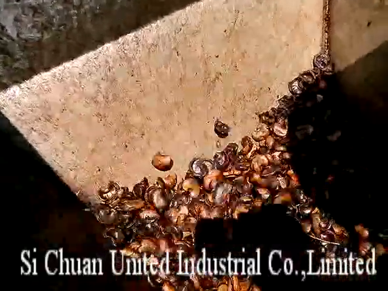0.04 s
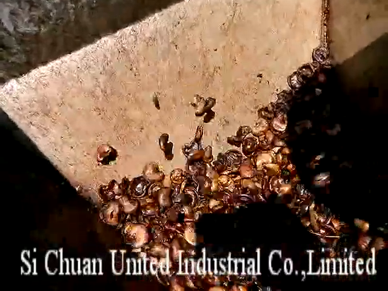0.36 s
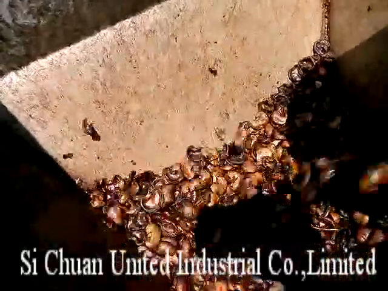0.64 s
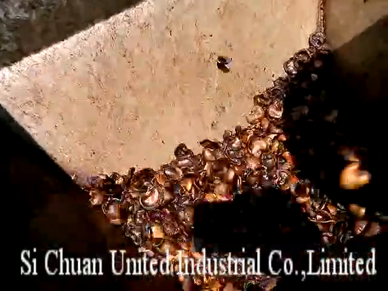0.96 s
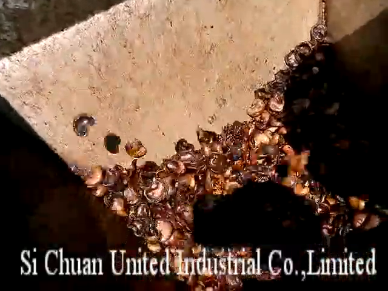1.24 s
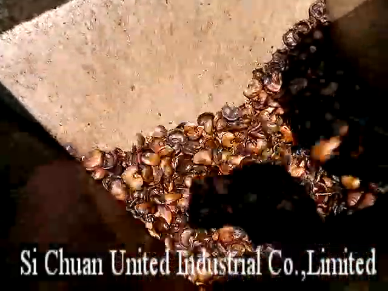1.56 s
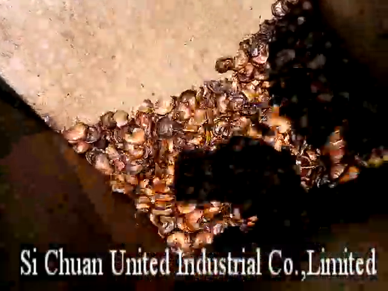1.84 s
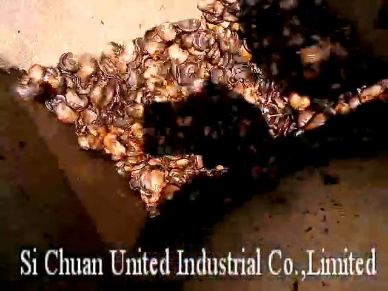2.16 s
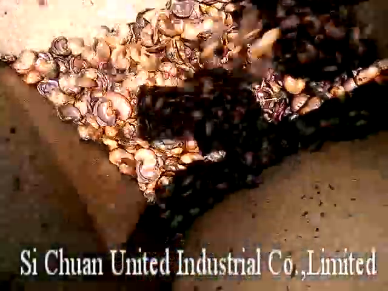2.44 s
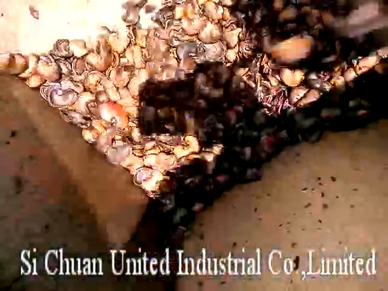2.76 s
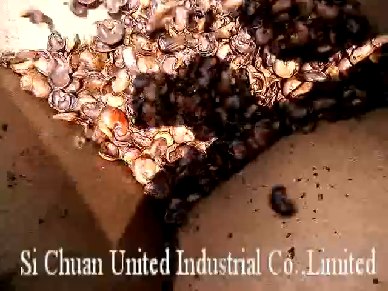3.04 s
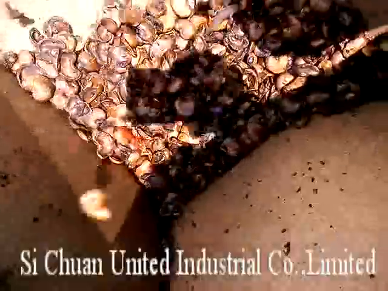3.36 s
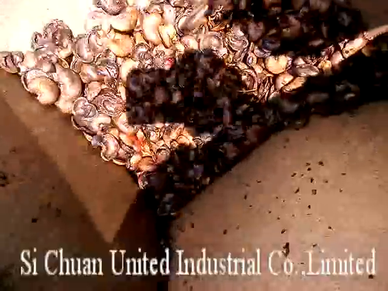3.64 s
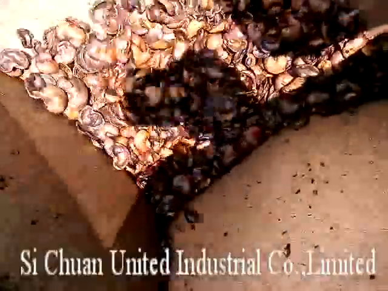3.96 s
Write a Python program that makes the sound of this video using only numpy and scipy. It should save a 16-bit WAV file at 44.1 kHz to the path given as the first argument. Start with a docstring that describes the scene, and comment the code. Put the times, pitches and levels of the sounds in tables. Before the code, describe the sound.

A screw press crushes nut shells, heard close to its hopper. From the start, dense crackling runs over a rumbling, humming drive and a screw grinding and briefly groaning against ringing steel. Hard shells split and clatter on metal at irregular moments, hitting harder from about 2 to 3 seconds, with a last few just before the end at 4 seconds. The sound is dull and distorts on peaks.

```python
"""A screw press crushes nut shells in a factory, heard close to the hopper that feeds it.
From the start the drive rumbles and hums, the screw grinds and groans against its ringing steel barrel,
and shells crackle without pause. Now and then a hard shell splits, or a batch bursts and clatters on
the metal. The bursts hit harder from about 2 s to 3 s, and a last few come just before the end at 4 s.
All along, the sound is dull, with little above 4.6 kHz, and distorts on the peaks."""
import sys
import numpy as np
from scipy import signal
from scipy.fft import rfft, irfft
from scipy.io import wavfile

SR = 44100
rng = np.random.default_rng(int(sys.argv[2]) if len(sys.argv) > 2 else 0)


def store_pcm(level_fs):
    """Save levels as 16-bit WAV."""
    pcm = np.round(np.clip(level_fs, -1, 1) * 32767).astype(np.int16)
    wavfile.write(sys.argv[1], SR, np.atleast_2d(pcm).T)


N = 176400
TIME = np.arange(N) / SR
SURGE_HZ = 23  # how fast the loudness flutters
FRAGMENTS_PER_S, FRAGMENT_SPREAD_DB = 2600, 2.9


def shells(clatter, snap):
    """Crushed shells crackle and knock; at each burst they snap and shower the steel with bits."""
    # how strongly shells are being crushed: (time [s], relative level [dB])
    feed = [(0, -13), (1.98, -13), (2.05, -15), (2.1, -9), (2.6, -13), (2.82, -11.5), (3.84, -10.5),
            (4, -11)]
    # strength of the bright part of the crackle: (time [s], relative level [dB])
    treble = [(0, -19), (1.26, -18.5), (1.4, -20), (2.7, -21), (3.16, -14.5), (3.46, -25.5), (3.48, -22),
              (4, -17)]
    # tone colour of the crackle: (frequency [Hz], relative level [dB])
    crackle_colour = [(300, -12.5), (600, -9.5), (950, 0.5), (1400, 4), (1750, 0), (2370, -2), (3300, 0),
                      (3750, -5.5), (4300, -17.5), (5000, -33.5)]
    # tone colour of bits hitting steel: (frequency [Hz], relative level [dB])
    clatter_colour = [(400, -11), (750, -16), (1100, 0), (1500, 4), (1900, -6), (2600, -11), (4500, -39.5)]
    # tone colour of the shells' own snap: (frequency [Hz], relative level [dB])
    snap_colour = [(900, -43), (1700, -3.5), (2200, 1.5), (2800, 3), (3350, 2), (3800, -14), (4800, -19)]
    split_hz, top_hz = 2436, 3270  # borders between dull, bright and top
    dull, bright, top = (colour(clicks(per_s=2200, spread_db=1), crackle_colour) for _ in range(3))
    dull = keep_side(dull, split_hz, "low")
    bright = keep_side(keep_side(bright, split_hz, "high"), top_hz, "low")
    bright += from_db(3.5 * drift(SURGE_HZ)) * keep_side(top, top_hz, "high")  # the top flickers
    feed_db = in_time(feed)
    out = np.hypot(from_db(feed_db - 7.5), 0.24 * clatter) * knocks()  # louder during bursts
    for crackle, level_db in ((dull, feed_db - 6), (bright, in_time(treble) - 1.5)):
        out += from_db(level_db + 1.86 * drift(SURGE_HZ)) * rms_one(crackle)
    on_steel = from_db(-6) * clatter * colour(fragments(), clatter_colour)
    breaking = from_db(-5) * snap * colour(fragments(), snap_colour)
    return out + on_steel + breaking


def bursts():
    """Batches of shells give way: three loudness curves that jump up, hold and die away."""
    # bursting batches, with relative levels:
    # (time [s], length [s], barrel ring [dB], clatter [dB], snap [dB])
    batches = [(0.021, 0.046, -14, -9, -10.5), (0.164, 0.011, -29.5, -10, -6.5),
               (0.391, 0.038, -13, -12.5, -17.5), (0.539, 0.023, -17, -7, -21),
               (1.046, 0.04, -11.5, -13, -9.5), (1.227, 0.062, -14, -10, -8.5),
               (1.314, 0.024, -15.5, -9, -14.5), (1.42, 0.027, -16.5, -25, -20),
               (1.538, 0.008, -30.5, -5.5, -13.5), (1.829, .012, -17.5, -6.5, -5.5),
               (2.060, 0.035, -12, -3.5, -10), (2.211, 0.0067, -5, -6, -20.5),
               (2.245, 0.016, -7.5, -15, -34), (2.669, 0.042, -13, -14, -16.5),
               (2.755, 0.0094, -5, -6.5, -11.5), (2.831, 0.047, -7, -5, -11.5),
               (2.89, 0.15, -23.5, -9, -27), (3.002, 0.034, -12.5, -5, -18), (3.155, 0.09, -13, -18, -16),
               (3.539, 0.042, -35.5, -7, -16), (3.74, 0.0079, -7.5, -7, -25), (3.9, 0.033, -18, -4, -10),
               (3.948, 0.012, -17, -2, -27)]
    rise_s, decay_s = 0.0015, 0.014
    power = np.zeros((3, N))
    for start_s, length_s, *levels_db in batches:
        start = int(start_s * SR)
        age = TIME[start:][:SR // 2] - start_s
        shape = np.clip(age / rise_s, 0, 1) * np.exp(-np.maximum(age - length_s, 0) / decay_s)
        power[:, start:start + len(age)] += np.outer(from_db(levels_db), shape) ** 2
    return np.sqrt(power)


def fragments():
    """Breaking shell makes a dense run of clicks, many small and a few large."""
    return clicks(FRAGMENTS_PER_S, FRAGMENT_SPREAD_DB)


def knocks():
    """Single shells hit the hopper and ring at random pitches; high ones die sooner."""
    per_s, low_hz, high_hz = 170, 798.4, 3290
    ring_cycles = 147  # vibrations it takes to fade by 60 dB
    out, age = np.zeros(N + SR), TIME[:SR // 10]
    for when, pitch, size, flip in rng.random((2000, 4))[:int(per_s * N / SR)]:
        hz = low_hz * (high_hz / low_hz) ** pitch
        db = 2.5 * min(-np.log(size), 3) - 60 * age * hz / ring_cycles
        ring = from_db(db) * np.sin(2 * np.pi * hz * age)
        out[int(when * N):][:len(age)] += ring * np.sign(flip - .5)
    return rms_one(out[:N])


def cracks():
    """A hard shell splits: a quick, fading run of tiny breaks rings around one pitch."""
    # hard shells splitting: (time [s], pitch [Hz], level [dB])
    splits = [(0.036, 1964, -12), (0.343, 2500, -26), (1.051, 2330, -11.5), (1.862, 2760, -20),
              (2.062, 1600, -12), (2.668, 2020, -13), (2.77, 1750, -9), (2.865, 1534, -17),
              (3.191, 2000, -10.5), (3.264, 2680, -17), (3.479, 2080, -11.5), (3.568, 3050, -12.5),
              (3.918, 3150, -13)]
    peak_s = 0.0053
    out, age = np.zeros(N + SR), TIME[:SR // 10]
    shape = age / peak_s * np.exp(1 - age / peak_s)
    shape_rms = np.sqrt(np.mean(shape ** 2))
    for start_s, hz, db in splits:
        ring = resonate(fragments()[:len(age)] * shape, hz, width_hz=220)
        out[int(start_s * SR):][:len(age)] += from_db(db) * rms_one(ring) * shape_rms
    return out[:N]


def screw(jolts):
    """The drive shakes the barrel's low notes; the rubbing screw and bursts ring the higher ones."""
    # grinding load on the screw: (time [s], relative level [dB])
    load = [(0, -13.5), (.3, -18), (.41, -9.5), (.52, -18), (1.3, -17.5), (1.75, -17.5), (2.05, -14.5),
            (2.26, -14.5), (2.42, -16.5), (2.68, -13), (2.74, -22), (2.82, -12.5), (3.5, -18),
            (3.77, -16.5), (4, -14)]
    split_hz = 472
    shaking = from_db(-18.5) * rms_one(keep_side(rng.standard_normal(N), split_hz, "low"))
    rubbing_db = in_time(load) - 1.5 + 4.2 * drift(SURGE_HZ)
    rubbing = from_db(rubbing_db) * clicks(per_s=1800, spread_db=-0.5)
    knocking = jolts * fragments()
    return barrel(shaking) + barrel(keep_side(rubbing + knocking, split_hz, "high"))


def barrel(force):
    """The steel rings at its own notes, as strongly as the force that pushes it."""
    # notes of the barrel and hopper: (pitch [Hz], width [Hz], relative level [dB])
    notes = [(375.3, 36, -2), (419.2, 19.5, 4.5), (445.7, 19.7, 1.5), (497, 21, 1.5), (551.4, 16.4, 4),
             (608, 70, -1), (660, 35.6, 0), (753.4, 21, 5), (810, 45, 1.5), (1092, 92, -5), (1306, 13, -9),
             (1419, 37, -10)]
    out = 0
    for k, (hz, width_hz, db) in enumerate(notes):
        delayed = np.roll(force, k * SR // 1000)  # each note is pushed 1 ms after the last
        out = out + from_db(db) * resonate(delayed, hz, width_hz)
    return rms_one(out) * force.std()


def groans():
    """The screw sticks for a moment, and one note of the press swells and fades."""
    # groans of the press: (time [s], pitch [Hz], level [dB])
    swells = [(0.05, 756, -16.5), (0.085, 554, -18), (0.146, 554, -16), (0.152, 189.5, -13),
              (0.208, 553, -19), (1.101, 177, -19), (1.612, 176.5, -15), (1.664, 199, -17),
              (2.243, 408, -15), (2.518, 412, -13.5), (2.897, 440, -13), (2.991, 557, -14),
              (3.169, 763, -17), (3.247, 201.3, -19.5), (3.39, 180.5, -17), (3.773, 748, -16.5)]
    width_s = 0.023
    out = np.zeros(N)
    for peak_s, hz, db in swells:
        swell = np.exp(-((TIME - peak_s) / width_s) ** 2 / 2)
        out += from_db(db) * swell * tone(hz)
    return out


def drive():
    """The motor and gearbox make a fluttering rumble and a few wavering tones."""
    # tone colour of the rumble: (frequency [Hz], relative level [dB])
    rumble_colour = [(25, -45), (62, -16), (85, -18), (105, -7.5), (155, -3), (210, 0.5), (250, -4),
                     (280, -8.5), (400, -17), (800, -54.5)]
    # motor and gear tones: (pitch [Hz], average level [dB])
    hum = [(177.6, -34.5), (299.5, -33.5), (552, -30.5)]
    out = from_db(-19.5 + 2.5 * drift(SURGE_HZ)) * colour(rng.standard_normal(N), rumble_colour)
    for hz, db in hum:
        out += from_db(db + 3.5 * drift(3.3)) * tone(hz)
    return out


def clicks(per_s, spread_db):
    """Clicks at random moments; a spread further from 0 makes their sizes more uneven."""
    sizes = from_db(spread_db * np.minimum(rng.exponential(1, N), 4))
    happens = rng.random(N) < per_s / SR
    return rms_one(happens * sizes * rng.choice([-1, 1], N))


def resonate(force, hz, width_hz):
    """Ring at one pitch; the smaller the width, the longer the ring."""
    r = np.exp(-np.pi * width_hz / SR)
    feedback = [1, -2 * r * np.cos(2 * np.pi * hz / SR), r * r]
    return (1 - r * r) * signal.lfilter([1, 0, -1], feedback, force + 1e-18)


def tone(hz):
    """A pure tone whose pitch wanders slightly."""
    pitch_hz = hz * (1 + 0.0025 * drift(2.76))
    return np.sqrt(2) * np.sin(2 * np.pi * np.cumsum(pitch_hz) / SR)


def colour(x, spectrum):
    """Give a sound the tone colour in a table, at an average power of 1."""
    hz, db = np.transpose(spectrum)
    curve_db = np.interp(np.log(np.fft.rfftfreq(N, 1 / SR) + 1), np.log(hz), db)
    # a minimum-phase filter: it rings after each click, never before
    cepstrum = irfft(np.log(from_db(curve_db)), N)
    cepstrum[1:N // 2] *= 2
    cepstrum[N // 2 + 1:] = 0
    return rms_one(irfft(rfft(x) * np.exp(rfft(cepstrum)), N))


def keep_side(x, hz, side):
    """Keep the "low" or the "high" side of a frequency."""
    return signal.sosfilt(signal.butter(4, hz, side, fs=SR, output="sos"), x)


def drift(hz):
    """A smooth random wobble of typical size 1, mostly slower than hz."""
    smoothing = 1 + (np.fft.rfftfreq(N, 1 / SR) / hz) ** 2
    return rms_one(irfft(rfft(rng.standard_normal(N)) / smoothing, N))


def in_time(rows):
    """Join (time, value) points with straight lines."""
    return np.interp(TIME, *np.transpose(rows))


def rms_one(x):
    """Scale to an average power of 1."""
    return x / np.sqrt(np.mean(x ** 2) + 1e-20)


def from_db(db):
    """Turn decibels into a number to multiply by."""
    return 10 ** (np.asarray(db) / 20)


def scene():
    """The press and its shells together, in one channel."""
    jolts, clatter, snap = bursts()
    return (drive() + screw(jolts) + shells(clatter, snap) + groans() + cracks())[None]


def record(dry):
    """The sound is dulled, and the loudest peaks are rounded off and clipped, with a faint high fizz."""
    soft_limit, hard_limit, fizz_onset = 0.84, 0.92, 0.94
    treble_top_hz, cutoff_hz = 4594, 16000
    rounded = dry / (1 + (dry / soft_limit) ** 8) ** (1 / 8)
    dulled = signal.sosfilt(signal.cheby1(12, .2, treble_top_hz, fs=SR, output="sos"), rounded)
    clipped = np.clip(dulled, -hard_limit, hard_limit)
    overshoot = np.clip(dry, -fizz_onset, fizz_onset) - dry
    fizz = from_db(-20.5) * keep_side(overshoot, treble_top_hz, "high")
    return signal.sosfilt(signal.ellip(10, .05, 70, cutoff_hz, fs=SR, output="sos"), clipped + fizz)


dry = scene()
out = record(dry)
store_pcm(out)
```